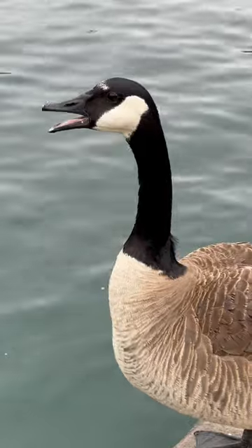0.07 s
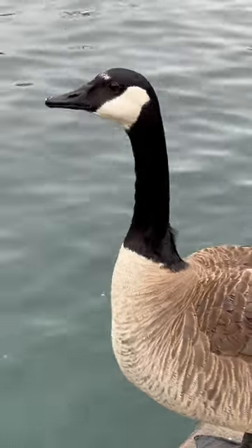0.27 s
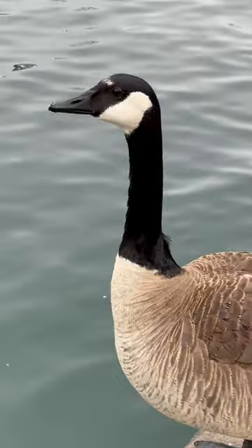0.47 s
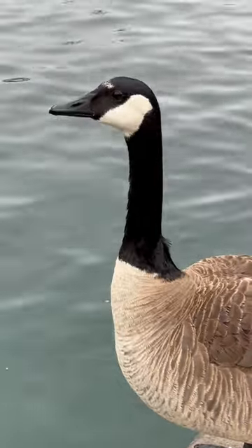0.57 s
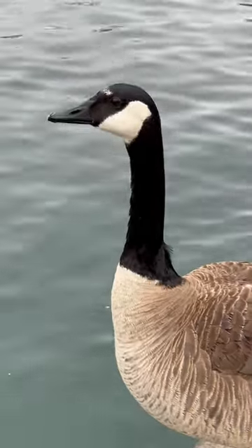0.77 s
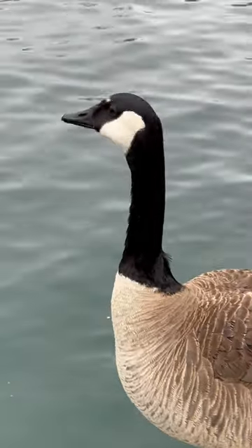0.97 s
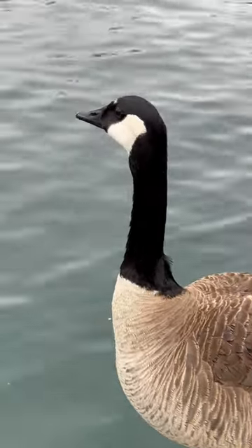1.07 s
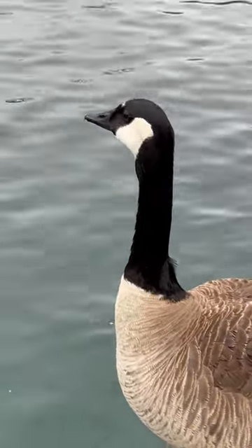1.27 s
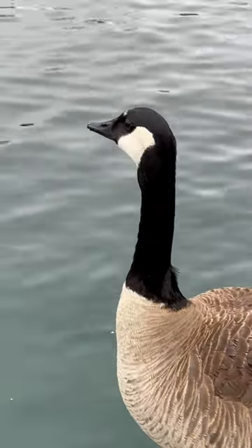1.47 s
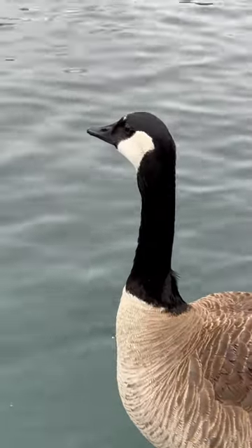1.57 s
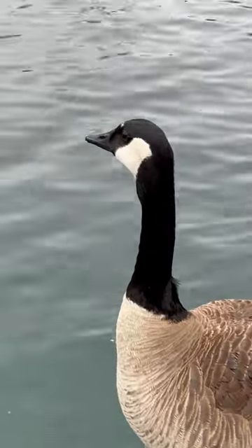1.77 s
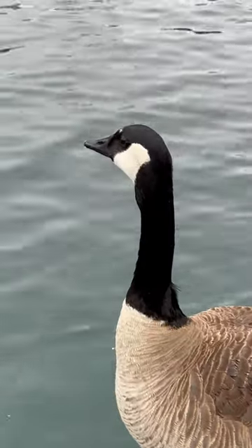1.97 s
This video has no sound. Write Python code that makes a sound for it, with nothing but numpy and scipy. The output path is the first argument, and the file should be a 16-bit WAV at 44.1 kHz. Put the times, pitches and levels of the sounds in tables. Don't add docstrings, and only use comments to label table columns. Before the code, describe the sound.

A goose's loud, brassy honk, cut in midway, falls off quickly beside a quietly lapping pond.

```python
import sys
import numpy as np
from scipy import signal
from scipy.fft import rfft, irfft, next_fast_len
from scipy.io import wavfile
from scipy.ndimage import uniform_filter1d, map_coordinates

SR = 44100
rng = np.random.default_rng(int(sys.argv[2]) if len(sys.argv) > 2 else 0)


def boost_factor(decibels):
    exponent = np.asarray(decibels, float) / 20
    return 10 ** exponent


def generate_wav(sig):
    pcm = np.round(np.clip(np.atleast_2d(sig).T, -1, 1) * 32767).astype(np.int16)
    wavfile.write(sys.argv[1], SR, pcm)


N = 88420

# [time_s, pitch_hz, effort_db]
LOWER_MEMBRANE = [
    (0.041, 462.5, -15),
    (.075, 449.5, -15),
    (0.146, 455.8, -13),
    (0.202, 448, -14),
    (0.232, 444.9, -15.5),
    (0.262, 422.5, -17.5),
    (0.28, 390.5, -44),
    (0.305, 354.4, -45),
]
# [time_s, pitch_hz]
UPPER_MEMBRANE = [(.04, 595.4), (.075, 580.1), (.2, 577.7), (.235, 563), (.26, 529), (.3, 440)]
MIXES = [(1, 0), (5, -3), (0, 1), (4, -2), (-1, 2), (3, -1), (-2, 3), (2, 0), (6, -3), (1, 1), (5, -2),
         (0, 2), (4, -1), (-1, 3), (3, 0), (-2, 4), (2, 1), (1, 2), (0, 3), (-1, 4), (3, 1), (-2, 5),
         (-1, 1)]
EARLY_DB = [-7.5, -22, -13, -24.5, -18, -28, -19, -9, -14, -12, -19, -9, -17, -15, -20, -9, -15.5, -21.5,
            -22, -23, -15, -15, -19]
LATE_DB = [-5.5, -22, -10.5, -22, -23, -20, -21, -2.5, -19, -9.5, -17, -18, -30, -18, -17, -14.5, -13.5,
           -24, -24, -25, -18.5, -21, -22]
# [centre_hz, width_hz, level_db]
WINDPIPE = [(505, 154, -1.5), (1040, 185, 0), (1513, 80, 0), (2045, 48, -7), (2430, 72, -11.5)]
# [freq_hz, level_db_per_hz]
HONK_TREBLE = [(1700, -33), (1950, 1.5), (2200, 2.5), (2900, -1.5), (4700, -12), (5200, -15.5),
               (7000, -27.5), (11500, -52)]
# [start_s, end_s]
TAIL_S = (.256, .29)
# [time_s, pitch_hz]
END_SQUEAK = [(.268, 1230), (.307, 990)]
# [time_s, pitch_hz]
END_SAG = [(.265, 415), (.312, 345)]
# [freq_hz, side_over_mid_db]
SIDE_LEAN = [(110, -50), (300, -17), (800, -18), (1700, -24), (2200, -40), (6500, -50), (7300, -4),
             (12000, -1)]

# [time_s, level_db]
AIR = [(.3, -41.5), (.6, -39.5), (1.2, -40), (2.0, -38.5)]
# [freq_hz, level_db_per_hz]
RUMBLE = [(25, -34), (48, -2.5), (120, -2.5), (216, -3), (300, -8), (400, -12)]
# [freq_hz, level_db_per_hz]
WASH = [(250, -6), (486, 0), (1100, -6), (3030, -17.5), (5090, -29.5), (8000, -26.5), (10500, -34.5),
        (11200, -46.5)]
# [freq_hz, side_level_db_per_hz]
PORT_NOISE = [(300, 12), (1500, 11.5), (2000, -71), (7300, -77), (8000, -16), (11000, -1), (15600, -19.5)]

# [time_s, pitch_hz, level_db]
MOAN = [
    (.15, 229, -42),
    (.22, 230, -38),
    (.35, 232, -35),
    (.42, 230.5, -30),
    (.52, 229, -30),
    (.55, 180, -39),
    (.585, 231, -39),
    (.67, 222, -41),
    (.71, 170, -44),
]
# [multiple, level_db]
MOAN_PARTS = [(.5, -10), (1, 0), (1.5, -18), (2, -22), (3, -27)]
# [freq_hz, level_db_per_hz]
MOAN_RASP = [(300, -2.5), (600, -1.5), (1000, -1), (1300, -13.5)]

# [start_s, peak_db, pitch_hz]
TICKS = [(.401, -42, 8300), (.465, -43, 7600), (.502, -43, 9200), (.578, -44, 6500), (0.641, -40, 8400),
         (0.6579, -40, 7900), (0.9352, -39, 7360), (1.0683, -41, 7300), (1.4724, -33, 10300),
         (1.4844, -39, 6100), (1.6372, -31, 8000), (1.68, -43, 7400), (1.692, -42, 5500),
         (1.833, -43, 5700), (1.852, -43, 5500), (1.9602, -35.5, 9360), (1.9732, -38.5, 7100)]
# [start_s, end_s]
SPLASH_S = (.91, 1.01)
# [freq_hz, level_db]
SPLASH_COLOUR = [(500, -12), (1200, 0), (2500, -3), (3600, -18)]

# [time_s, pitch_hz]
PEEPS = [
    [(.722, 1990), (.74, 2586), (.77, 3470), (.81, 3040), (.85, 2274)],
    [(.985, 1987), (1.0, 2445), (1.02, 3310), (1.03, 4000), (1.05, 4060), (1.066, 4000), (1.08, 3250),
     (1.1, 2710), (1.13, 2110)],
    [(1.218, 1924), (1.25, 2730), (1.275, 3390), (1.29, 3535), (1.31, 2980), (1.368, 1943)],
    [(1.475, 1780), (1.51, 2750), (1.528, 3513), (1.54, 3610), (1.575, 3265), (1.595, 3270), (1.62, 2765),
     (1.652, 1815)],
    [(1.765, 1802), (1.8, 2890), (1.815, 3283), (1.828, 3386), (1.85, 2830), (1.89, 2000)],
]
# [whistle_db, under_octave_db, over_octave_db, hiss_db]
PEEP_DB = [(-51.5, -49, -65, -64), (-47, -39, -59.5, -57.5), (-48, -37, -50.5, -61),
           (-46.5, -33.5, -51, -49), (-44, -39, -55, -50)]
# [freq_hz, level_db]
HISS = [(5500, -12), (6300, -10), (6900, -3), (7500, -4), (8300, -2), (8850, 0), (9400, -5.5), (10800, -25)]
# [time_s, pitch_hz]
AFTER_PEEP = [(1.838, 1620), (1.86, 1680), (1.892, 1740)]


def unit(x):
    return x / np.sqrt(np.mean(x ** 2) + 1e-20)


def along(points, hz):
    f, v = np.transpose(points)
    return np.interp(np.log(hz + 1), np.log(f + 1), v)


def curves(rows):
    s, *cols = np.transpose(rows)
    return [np.interp(np.arange(N) / SR, s, c) for c in cols]


def wobble(rate):
    knots = rng.standard_normal(int(N * rate / SR) + 4)
    return map_coordinates(knots, [np.arange(N) * rate / SR])


def filtered(x, response):
    m = next_fast_len(N + SR // 2)
    return irfft(rfft(x, m) * response(np.fft.rfftfreq(m, 1 / SR)), m)[..., :N]


def rush(spectrum, patchy_db):
    z = signal.stft(rng.standard_normal(N + 512), nperseg=512)[2]
    patches = uniform_filter1d(rng.standard_normal(z.shape), size=6, axis=0)
    patches = uniform_filter1d(patches, size=10, axis=1)
    x = signal.istft(z * boost_factor(patchy_db * unit(patches)), nperseg=512)[1][:N]
    closed = [(spectrum[0][0] * .93, -90)] + list(spectrum) + [(spectrum[-1][0] * 1.05, -90)]
    return unit(filtered(x, lambda hz: boost_factor(along(closed, hz))))


def turns(hz):
    return 2 * np.pi * np.cumsum(hz) / SR


def gate(start_s, end_s, edge_s):
    t = np.arange(N) / SR
    return np.clip(np.minimum(t - start_s, end_s - t) / edge_s, 0, 1)


def whistle(rows, db):
    return boost_factor(db) * gate(rows[0][0], rows[-1][0], edge_s=0.0048) * np.sin(turns(curves(rows)[0]))


def product(lower, upper, m, n, db):
    level = boost_factor(db + 1.3 * wobble(31.6))
    scatter = 1.7 * rng.standard_normal()
    return level * np.sin(np.pi + m * lower + n * upper + scatter)


def windpipe(hz):
    total = 0
    for k, (centre, width, db) in enumerate(WINDPIPE):
        total = total + (-1) ** k * boost_factor(db) * 1j * hz * width / (centre * centre - hz * hz + 1j * hz * width)
    return total


def neck_treble(hz):
    return boost_factor(along(HONK_TREBLE, hz)) / (1 - .6 * np.exp(-2j * np.pi * hz / 470))


def honk():
    solo_s, shut_s = 0.264, 0.297
    low_hz, effort_db = curves(LOWER_MEMBRANE)
    high_hz, = curves(UPPER_MEMBRANE)
    lower = turns(low_hz + 1.75 * wobble(60)) + 1.286
    upper = turns(high_hz + 2.1 * wobble(60))

    wane_db = -9 * gate(.232, 9, edge_s=0.029)
    late = np.clip((np.arange(N) / SR - .04) / 0.16, 0, 1)
    lines = np.zeros(N)
    for (m, n), early_db, late_db in zip(MIXES, EARLY_DB, LATE_DB):
        db = early_db + (late_db - early_db) * late + wane_db * (n > 1 or m > 2)
        lines += np.sqrt(2) * product(lower, upper, m, n, db)

    clear_db = -14 * gate(solo_s - .01, 9, edge_s=.01)
    high = np.zeros(N)
    for k in range(5, 18):
        for n in (0, 1, 2, k):
            high += product(lower, upper, k - n, n, 5 * (n != 1) + clear_db * (n != 0))
    high = unit(filtered(high, neck_treble))

    puffs = (1 + 0.56 * np.cos(lower)) * (1 + 0.56 * np.cos(upper - lower))
    rasp = filtered(puffs * rng.standard_normal(N), lambda f: windpipe(f) * f ** 2 / (f ** 2 + 350 ** 2))
    fizz = unit(filtered(puffs * rng.standard_normal(N), neck_treble))

    voice = (lines + boost_factor(-10.5) * unit(rasp)) * gate(-1, shut_s, edge_s=0.013)
    hold = boost_factor(21.5 * gate(solo_s, 9, edge_s=0.025)) * gate(-1, shut_s, edge_s=0.014)
    voice = voice + hold * (boost_factor(-20) * high + boost_factor(-15.5) * fizz)
    voice = boost_factor(effort_db) * gate(-1, LOWER_MEMBRANE[-1][0] + 0.0069, edge_s=0.011) * voice

    pulses = sum(np.sin(k * lower + .1 * k) for k in range(5, 18))
    pulses = unit(filtered(pulses, lambda hz: boost_factor(along(HONK_TREBLE, hz * 1.08))))
    tail = boost_factor(-31) * gate(*TAIL_S, edge_s=0.016) * pulses
    return tail + voice + whistle(END_SQUEAK, db=-34) + whistle(END_SAG, db=-31)


def bank_echo(goose):
    t, t60_s = np.arange(SR // 3) / SR, 0.37
    tail = rng.standard_normal(len(t)) * boost_factor(-60 * t / t60_s)
    return boost_factor(-30) * signal.fftconvolve(goose, tail / np.linalg.norm(tail))[:N]


def air():
    db, = curves(AIR)
    drone_hz, drone_width_hz = 98, 6
    drone = filtered(rng.standard_normal(N), lambda f: 1 / (1 + ((f - drone_hz) / drone_width_hz) ** 2))
    rumble = boost_factor(-36.5 + .6 * wobble(6)) * rush(RUMBLE, patchy_db=.8)
    wash = boost_factor(-0.5 + db + .7 * wobble(9)) * rush(WASH, patchy_db=1.3)
    ports = boost_factor(-54.5 + 1.1 * wobble(7)) * rush(PORT_NOISE, patchy_db=2.5)
    return np.array([rumble + boost_factor(-39) * unit(drone) + wash, ports])


def moan():
    hz, db = curves(MOAN)
    phase = turns(hz + 1.5 * wobble(40))
    parts = sum(boost_factor(d + 1.2 * wobble(25)) * np.sin(k * phase) for k, d in MOAN_PARTS)
    parts = parts + boost_factor(-12.5) * (1 + 0.4 * np.cos(phase)) * rush(MOAN_RASP, patchy_db=2.5)
    return np.sqrt(2) * boost_factor(db) * gate(MOAN[0][0], MOAN[-1][0], edge_s=0.0093) * parts


def water():
    out, t = np.zeros((2, N + SR)), np.arange(900) / SR
    t60_s, attack_s, side_db = 0.0083, 0.00068, -9.5
    for start_s, db, hz in TICKS:
        snap_db = -5 + 2.5 * min(db + 34, 0)
        body = np.sin(2 * np.pi * hz * t) + boost_factor(snap_db) * np.diff(rng.standard_normal((2, 901)))
        decay = boost_factor(db - 2.5 - 60 * t / t60_s) * np.minimum(t / attack_s, 1)
        out[:, round(start_s * SR):][:, :900] += decay * body * boost_factor([[0], [side_db]])
    splash = boost_factor(-43 + 1.2 * wobble(60)) * gate(*SPLASH_S, edge_s=.02)
    out[0, :N] += splash * rush(SPLASH_COLOUR, patchy_db=1.2)
    return out[:, :N]


def peeps():
    mid = np.zeros(N)
    for rows, (main_db, under_db, over_db, hiss_db) in zip(PEEPS, PEEP_DB):
        hz = uniform_filter1d(curves(rows)[0], size=300)
        phase = turns(hz + 40 * wobble(90))
        on = gate(rows[0][0], rows[-1][0], edge_s=.008)
        height = hz / hz.max()
        top = np.clip((height - .885) / .06, 0, 1)

        thin_db = .012 * np.clip(hz - 3600, 0, None)
        main = boost_factor(main_db - 0.33 * top - thin_db + 1.75 * wobble(70)) * np.sin(phase)
        under = top * boost_factor(under_db + 1.5 * wobble(52.65)) * np.sin(phase / 2)
        over = top * boost_factor(over_db + 3 * wobble(90)) * np.sin(2 * phase + 1.1 * wobble(200))
        mid += np.sqrt(2) * on * (main + under + over)

        rough = boost_factor(hiss_db + 2.5 + 3 * wobble(90)) * np.sin(2.5 * phase + 2.4 * wobble(300))
        mid += on * top * (2.5 * hz.max() < 9300) * rough
        breath = on * boost_factor(hiss_db + 2.1 * wobble(39.9)) * np.clip((height - .6) / 0.18, 0, 1)
        mid += breath * rush(HISS, patchy_db=3.0)
    return mid + whistle(AFTER_PEEP, db=-42.5)


def scene():
    mid_top_hz, notch_hz, notch_width_hz = 11300, 4970, 120
    goose = filtered(honk(), lambda f: f < mid_top_hz)
    echo = bank_echo(goose)
    mid, side = water() + air()
    mid = mid + goose + echo + moan() + peeps()

    def lean(f):
        slit = boost_factor(1) * np.exp(-((f - notch_hz) / 170) ** 4)
        return (boost_factor(along(SIDE_LEAN, f)) + slit) * np.exp(1j * np.where(f < 3000, 1.85, 1.57))

    def port_sum(f):
        notch = 1 - .68 / (1 + ((f - notch_hz) / notch_width_hz) ** 2)
        return notch * np.where(f < mid_top_hz, 1, .3)

    side = side + filtered(mid, lean)
    mid = filtered(mid, port_sum)
    mid = mid + boost_factor(-89 + 7 * wobble(17)) * rush([(15400, 0.0037), (15700, 0.0094)], patchy_db=-8)
    return np.array([mid + side, mid - side])


def band_limit(x):
    return signal.sosfilt(signal.butter(12, 17000, fs=SR, output="sos"), x)


def record(dry):
    top_hz, limit, start_s = 15800, .8, .0363
    mix = filtered(dry, lambda f: f < top_hz)
    mix = mix / (1 + np.abs(mix / limit) ** 6) ** (1 / 6)
    mix = mix * (np.arange(N) >= start_s * SR)
    return band_limit(mix)


dry = scene()
out = record(dry)
generate_wav(out)
```